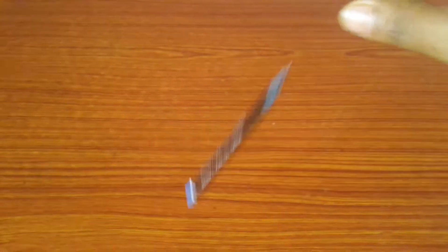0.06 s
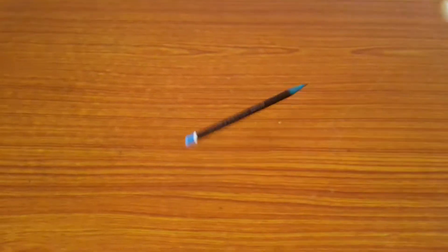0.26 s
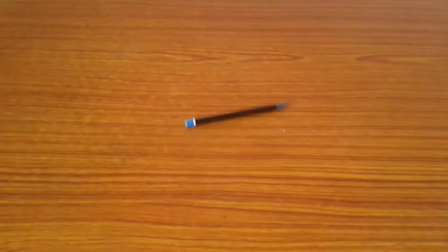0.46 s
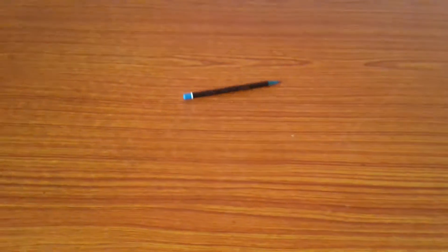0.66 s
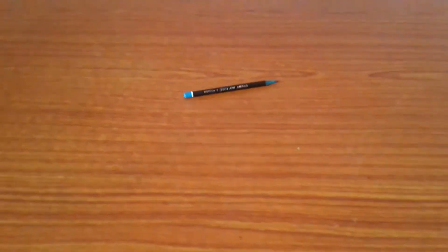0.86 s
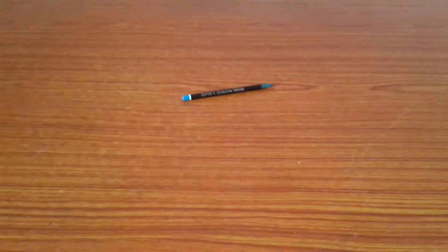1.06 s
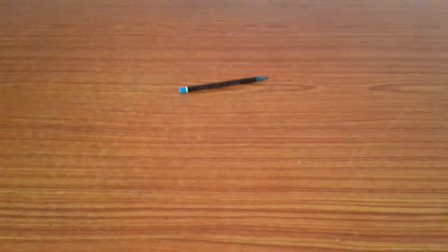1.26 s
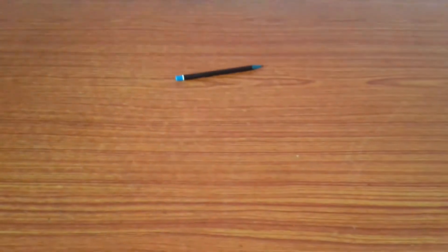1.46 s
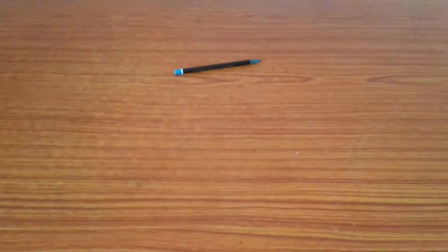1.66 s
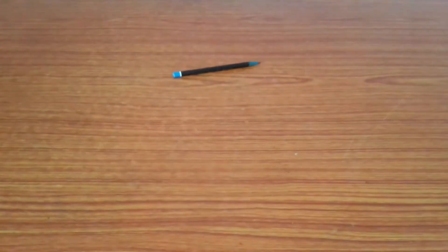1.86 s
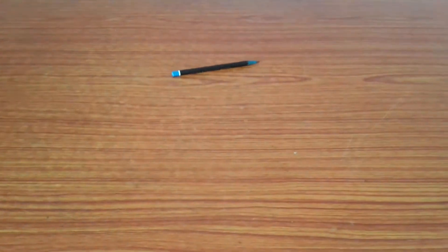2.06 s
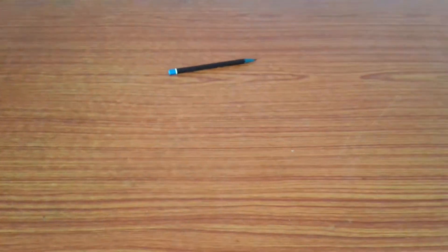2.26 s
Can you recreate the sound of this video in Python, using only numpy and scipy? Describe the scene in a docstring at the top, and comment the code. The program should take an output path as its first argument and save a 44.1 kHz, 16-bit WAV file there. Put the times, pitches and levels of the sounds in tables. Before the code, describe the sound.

A pencil falls onto a wooden table with sharp clacks and tiny metallic ticks, bounces, clatters, then rolls with ever softer bumps. It is heard close up in a bare, echoing room with faint rumble and hiss.

```python
"""A faint rumble and a thin hiss fill a bare, echoing room. A pencil falls on a wooden table:
one end lands, then the other, and its small metal fittings tink. It leaps, lands hard and clatters.
Each blow rings the pencil's barrel and the table top, and the room carries the sound on.
From about one second the pencil rolls away, bumping the table ever more softly."""
import sys
import numpy as np
from scipy import signal
from scipy.fft import rfft, irfft
from scipy.io import wavfile

SR = 44100
rng = np.random.default_rng(int(sys.argv[2]) if len(sys.argv) > 2 else 0)


def wav_record(signal):
    """Record a signal, one row per channel, as 16-bit PCM in the file named by sys.argv[1]."""
    frames = np.transpose(np.atleast_2d(signal))
    bounded = np.clip(frames, -1, 1)
    # unit amplitude maps onto the largest positive 16-bit level
    quanta = np.round(bounded * 32767).astype(np.int16)
    wavfile.write(sys.argv[1], SR, quanta)


N = 101429
TIME, FREQS = np.arange(N) / SR, np.fft.rfftfreq(N, 1 / SR)


def gain(db):
    """Turn decibels into a multiplier."""
    return 10 ** (np.asarray(db) / 20)


def look_up(hz, points, column=1):
    """Read between a table's rows, spacing the octaves evenly."""
    rows = np.array(points, float)
    return np.interp(np.log(np.maximum(hz, 1)), np.log(rows[:, 0]), rows[:, column])


def convolve(sound, response):
    """Play a sound through a response: the way something answers a single click."""
    return signal.fftconvolve(sound, response)[:N]


def colour(points, size=4096):
    """A click with the given balance of bass and treble; also works as a filter."""
    levels = gain(look_up(np.fft.rfftfreq(size, 1 / SR), points))
    cepstrum = irfft(np.log(levels))
    cepstrum[1:size // 2] *= 2
    cepstrum[size // 2 + 1:] = 0  # nothing sounds before the click starts
    return irfft(np.exp(rfft(cepstrum)))


def add(track, start_s, sound):
    """Mix a sound in at its time."""
    i = int(start_s * SR)
    track[i:i + len(sound)] += sound[:max(N - i, 0)]


def ring(notes):
    """Tones that die away; the ring time (t60) is how long a fade of 60 dB takes."""
    out = 0
    for hz, db, t60 in notes:
        wave = np.cos(2 * np.pi * hz * TIME) * np.exp(-np.log(1000) * TIME / t60)
        out = out + gain(db) * wave / np.linalg.norm(wave)
    return out


def noise(points):
    """Steady noise with the given balance of bass and treble."""
    shaped = irfft(rfft(rng.standard_normal(N)) * gain(look_up(FREQS, points)), N)
    return shaped / shaped.std()


# tone colours of the room's rumble and of the hiss (frequency [Hz], level [dB])
RUMBLE_COLOUR = [(20, -36), (45, 0), (80, -2.5), (150, -9), (300, -8), (600, -14), (1500, -22),
                 (3500, -32.5), (7000, -41.5), (16000, -59.5)]
HISS_COLOUR = [(5000, -34.5), (7800, -13.5), (9600, 1.5), (12000, -1.5), (16000, -2)]
# how loud the hiss is (time [s], level [dB])
HISS_LEVELS = [(0, -72.5), (.2, -70.5), (.5, -75), (0.999, -64), (1.4, -67.5), (1.899, -71.5), (2.3, -71.5)]


def background(rumble_db=-67.5):
    """Low room rumble, and a thin hiss that swells and sinks."""
    swell = gain(np.interp(TIME, *np.array(HISS_LEVELS).T))
    return noise(RUMBLE_COLOUR) * gain(rumble_db) + noise(HISS_COLOUR) * swell


# the room's echo from bass to treble (frequency [Hz], level [dB], ring time [s])
ECHO_BANDS = [(60, 9, 1.3), (130, 4.5, 0.77), (300, 13.5, 0.42), (600, 14.5, 0.33), (1200, 10.5, 0.88),
              (2400, 11.5, 0.83), (4670, 10.5, 0.76), (8000, 4.5, .65), (15000, 8.5, 0.56)]


def room_echo(count=18, build_s=0.0043):
    """Reflections from bare walls blur into noise; each band fades at its own pace."""
    white = rfft(rng.standard_normal(N))
    centres = np.geomspace(ECHO_BANDS[0][0], ECHO_BANDS[-1][0], count)
    build_up = 1 - np.exp(-TIME / build_s)
    out = 0
    for centre, pick in zip(centres, np.eye(count)):
        band = irfft(white * look_up(FREQS, list(zip(centres, pick))), N)
        fade = build_up * np.exp(-np.log(1000) * TIME / look_up(centre, ECHO_BANDS, 2))
        out = out + gain(look_up(centre, ECHO_BANDS)) * band * fade / np.linalg.norm(fade)
    return out


# the room's own notes (pitch [Hz], relative level [dB])
ROOM_NOTES = [(107.7, -53), (129.2, -53), (269.2, -56.5), (296.1, -76.5), (387.6, -53), (457.6, -58),
              (565.2, -70.5), (602.9, -70.5), (705.2, -74), (753.7, -64)]


def standing_waves(strongest_db=-17.5, ring_s=1.2):
    """Waves that fit between the walls linger as low notes."""
    top = max(db for _, db, in ROOM_NOTES)
    return ring([(hz, db - top + strongest_db, ring_s) for hz, db in ROOM_NOTES])


# the table top's own notes (pitch [Hz], level [dB], ring time [s])
TABLE_NOTES = [(180, -9, 0.1), (231.3, -13.5, 0.13), (273, -13, .3), (444, -10, 0.11), (589.6, -17, 0.2),
               (616, -10.5, 0.12), (766.3, -14, 0.19), (987, -12, 0.34), (1082, -10.5, 0.035)]


def table_top(force):
    """Every push makes the wooden top ring."""
    return convolve(force, ring(TABLE_NOTES))


# paths of waves through the table top (travel time at 1 kHz [s], level [dB])
BENDING_PATHS = [(.0021, -4.5), (.0048, -3.5)]


def bending_waves(size=4096):
    """Ripples bend the table top as they travel; the treble arrives first."""
    hz = np.fft.rfftfreq(size, 1 / SR)
    return irfft(sum(gain(db) * np.exp(-4j * np.pi * s * np.sqrt(1000 * hz)) for s, db in BENDING_PATHS))


def edge_echoes(peak_s, decay_s, size=2048):
    """The table's edges throw back a dense cluster of waves just after a contact."""
    t = np.arange(size) / SR
    shape = np.minimum(t / peak_s, 1) ** 2 * np.exp(-np.maximum(t - peak_s, 0) / decay_s)
    cluster = rng.standard_normal(size)
    for _ in range(3):  # even it out so that no pitch sticks out
        spectrum = rfft(cluster * shape)
        cluster = irfft(spectrum / (np.abs(spectrum) + 1e-12)) / np.maximum(shape, .1)
    return cluster * shape / np.linalg.norm(cluster * shape)


# tinks of the pencil's metal fittings (time [s], pitch [Hz], level [dB])
TINKS = [(0.2676, 9010, -1.5), (0.267, 13980, 8.5), (0.277, 13010, -0.5), (0.2925, 9400, -2.5),
         (0.2945, 12600, -5.5), (0.3055, 11420, 4)]


def tinks(ring_s=0.0043):
    """The small metal parts each give a very short, high ring."""
    out = np.zeros(N)
    for s, hz, db in TINKS:
        add(out, s, ring([(hz, db, ring_s)]))
    return out


# bumps of the rolling barrel (time [s], level [dB], brightness [dB], treble limit [Hz])
BUMPS = [(1.008, -22, 7, 4170), (1.041, -27.5, -12, 3500), (1.07, -22, -13, 3500), (1.107, -23.5, 8, 5500),
         (1.138, -21.5, -2, 3500), (1.175, -22, 3.5, 4470), (1.215, -30, 1, 3530),
         (1.255, -30.5, 4.5, 3090), (1.289, -30.5, 2, 3500), (1.3257, -22, 5.5, 5540),
         (1.366, -24.5, -9, 3530), (1.411, -31, 4, 3260), (1.466, -32, -4.5, 2540), (1.5104, -20, 0, 3170),
         (1.566, -23.5, -1, 2870), (1.633, -25.5, -9.5, 2485), (1.7061, -27.5, -11, 2400),
         (1.806, -30, -3, 2400), (1.897, -32.5, -7.5, 1980), (1.959, -34, -10, 1516),
         (2.027, -34.5, -12, 1497), (2.074, -37.5, -6, 2200), (2.132, -37, -12.5, 1500),
         (2.179, -40, -10, 1487), (2.229, -36, -12.5, 1496), (2.269, -35, -1, 1990)]
# how loud the rumble between bumps is (time [s], level [dB])
ROLL_LEVELS = [(.8, -44), (1.0, -63.5), (1.15, -55.5), (1.42, -62.5), (1.55, -68), (1.9, -77.5),
               (2.3, -74.5)]
# tone colours of a hollow wooden bump and of that rumble (frequency [Hz], level [dB])
BUMP_COLOUR = [(40, -3), (105, 2), (220, -6.5), (400, -2), (540, 1.5), (615, 2), (700, -4), (830, -5.5),
               (1050, -5.5), (1450, -7.5), (2000, -4.5), (3300, -12.5), (5500, -16.5), (9000, -17.5),
               (16000, -46)]
ROLL_COLOUR = [(40, -8), (75, 4), (105, 13), (150, -1.5), (280, 3), (350, -5.5), (460, 5.5), (620, -6.5),
               (800, -2.5), (1100, -8), (1500, -8.5), (2100, -9.5), (3300, -8.5), (5500, -20), (9000, -35)]


def rolling(trim_db=-0.5, cut_db=-15.5, edge_db=1, bending_db=5):
    """The barrel bumps along over a faint rumble: returns its sound and the waves in the table."""
    force, edges = np.zeros(N), np.zeros(N)
    swell = gain(np.interp(TIME, *np.array(ROLL_LEVELS).T)) * (TIME > ROLL_LEVELS[0][0])
    rumble = convolve(rng.standard_normal(N) * swell, colour(ROLL_COLOUR))
    for s, db, bright_db, top_hz in BUMPS:
        brightness = colour([(650, 0), (2000, bright_db)])
        treble_cut = colour([(top_hz, 0), (2 * top_hz, cut_db)])
        push = gain(db + trim_db) * convolve(brightness, treble_cut)
        add(force, s, push)
        add(edges, s, gain(edge_db) * convolve(push, edge_echoes(peak_s=0.0049, decay_s=0.0048)))
    waves = edges + gain(bending_db) * convolve(force, bending_waves())
    hollow = colour(BUMP_COLOUR)
    return convolve(force, hollow) + rumble, convolve(waves, hollow)


# the barrel's own notes (pitch [Hz], level [dB], ring time [s])
BARREL_NOTES = [(2810, -28.5, .035), (3396, -31.5, .03), (4195, -20.5, 0.046), (4270, -19.5, 0.0396),
                (6330, -20.5, .015), (7750, -14.5, .02), (7900, -14.5, 0.12), (11860, -16, .014),
                (11940, -13, .025)]
# blows of the falling pencil (time [s], level [dB], thump [dB], knock [dB], clack [dB], tick [dB],
# low barrel notes [dB], high barrel notes [dB])
BLOWS = [(0.2180, -0.5, -6, -2.5, -4.5, -10, -9.5, -4), (0.244, -13, 6, 7, 6, -8.5, -12, -9),
         (0.2677, -7, 2, 8, 4.5, -1, -13, -28), (0.279, -11.5, 6.5, 9.5, 6, -1.5, -11.5, -19),
         (0.3056, -5.5, 3, 2.5, 6, 2.5, -14.5, 8), (0.3814, -11, -5, 3.5, 2, -12, -4, 8.5),
         (0.4904, 2, 4, -1, 4, 6, 3.5, 0), (0.534, -12, 9.5, 3, 3.5, 11, -9, -5),
         (0.5875, -4.5, 4, -1.5, -6, -0.5, -12, -11), (0.6390, -9, -6.5, 3.5, 8, -8.5, -12, 6),
         (0.6758, -6, -4.5, 1.5, -15, -22, 2, -5), (0.717, -16, 10.5, -1, 1, -13, 4, 3),
         (0.7286, -7.5, -3.5, 0, -2.5, -4.5, -5, -2), (0.767, -14.5, 13, 4.5, -2, -8, -9, -2),
         (0.8115, -13, 7.5, -4, 1.5, -11, -14, -5), (0.8377, -15.5, 7, 1.5, 0, -4, -21, -9),
         (0.8585, -13, 0.5, 0, 4, -4, -9, -1), (0.916, -21.5, 6, 2.5, 0, -22, -9, -7),
         (0.957, -36, 16, 13, -7, -15, -6, -3), (0.982, -41, 8, 24, -18, -9, 0, 2)]


def blows(trim_db=-1, edge_db=10, bending_db=-1):
    """Sharp hits ring the barrel: returns the pencil's sound and the waves in the table."""
    pencil, edges = np.zeros(N), np.zeros(N)
    low, high = ring(BARREL_NOTES[:5])[:SR // 8], ring(BARREL_NOTES[5:])[:SR // 8]
    for s, db, thump, knock, clack, tick, low_db, high_db in BLOWS:
        tone = [(110, thump), (500, knock), (1700, 0), (4400, clack), (10000, tick)]
        push = gain(db + trim_db) * colour(tone)
        add(pencil, s, push)
        add(pencil, s, convolve(push, gain(low_db) * low + gain(high_db) * high))
        add(edges, s, gain(edge_db) * convolve(push, edge_echoes(peak_s=0.003, decay_s=0.0034)))
    waves = edges + gain(bending_db) * convolve(pencil, bending_waves())
    wave_colour = colour([(100, -9.5), (500, -5), (2000, 1), (5000, 0), (9000, -4), (15000, -9.5)])
    return pencil, convolve(waves, wave_colour)


# tone colour of the snap that comes straight through the air (frequency [Hz], level [dB])
SNAP_COLOUR = [(100, -1), (600, -3), (1500, -13), (3200, 8.5), (6000, -2.5), (9000, 4), (12500, 8),
               (16000, 3)]
# tone colour shared by all contacts and their echoes (frequency [Hz], level [dB])
CONTACT_COLOUR = [(25, -26.5), (48, -55.5), (75, 6), (120, 4.5), (200, 2.5), (400, 5), (700, 6.5),
                  (1100, 5.5), (1450, 2.5), (2000, 3.5), (3000, 2), (4000, -3), (5300, -1.5), (6900, -12),
                  (8500, -10), (10500, -16.5), (16000, -24)]


def scene(blow_table_db=-4, roll_direct_db=-7, roll_room_db=-4, tink_room_db=-12):
    """Contacts ring barrel and table, and sound on in the room."""
    pencil, blow_waves = blows()
    roll, roll_waves = rolling()
    metal = tinks()
    table = table_top(gain(blow_table_db) * pencil + roll) + blow_waves + roll_waves
    snap = convolve(pencil, colour(SNAP_COLOUR))
    near = snap + gain(roll_direct_db) * roll + table + metal
    into_room = pencil + gain(roll_room_db) * roll + gain(tink_room_db) * metal
    far = convolve(into_room, room_echo() + standing_waves())
    contacts = convolve(near + far, colour(CONTACT_COLOUR)) * gain(-1)
    return (contacts + background())[None]


def record(dry, ceiling=0.49, top_hz=15800):
    """Round off the tallest peaks and cut the highest treble."""
    rounded = ceiling * np.tanh(dry / ceiling)
    return signal.sosfilt(signal.ellip(10, .2, 70, top_hz, fs=SR, output="sos"), rounded)


dry = scene()
out = record(dry)
wav_record(out)
```